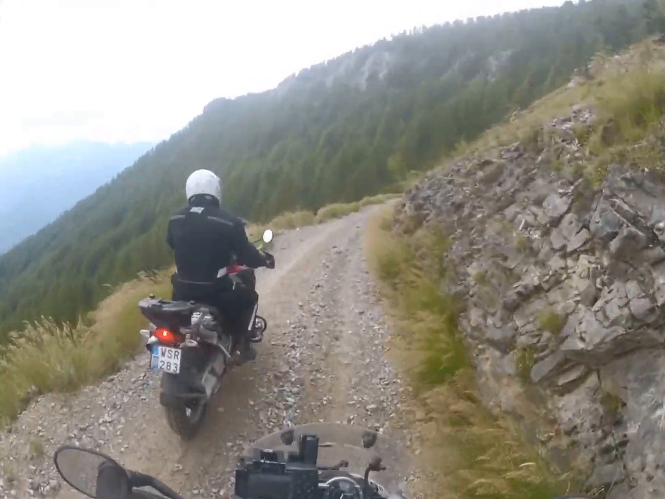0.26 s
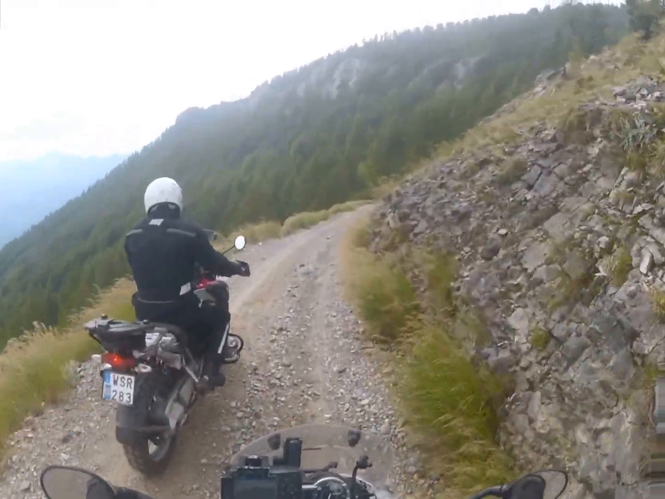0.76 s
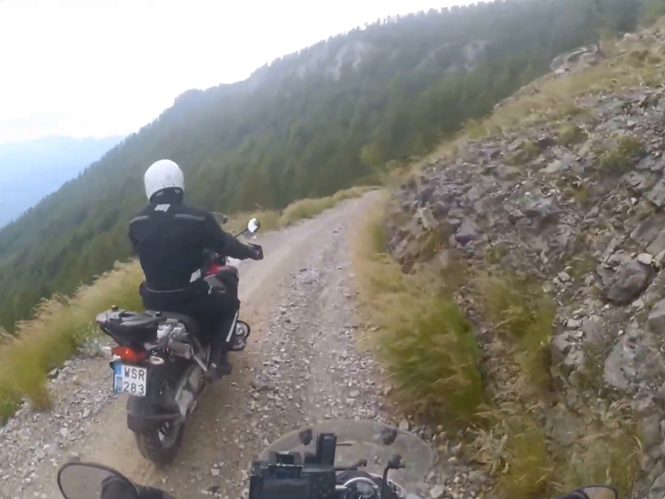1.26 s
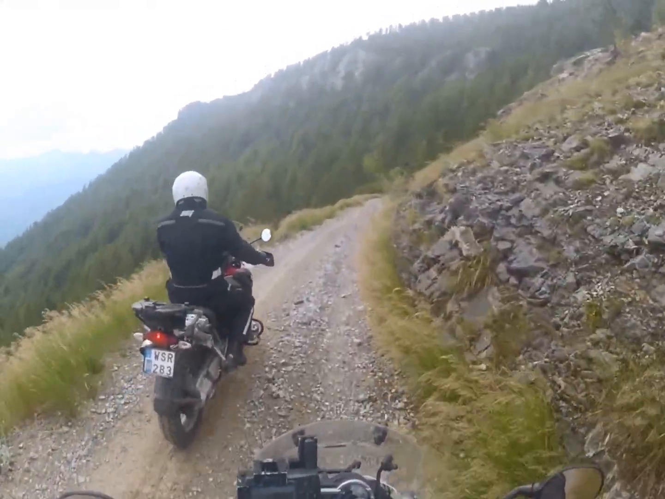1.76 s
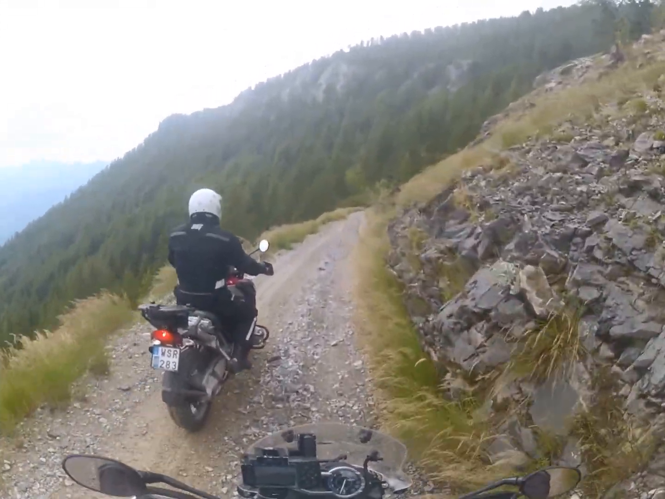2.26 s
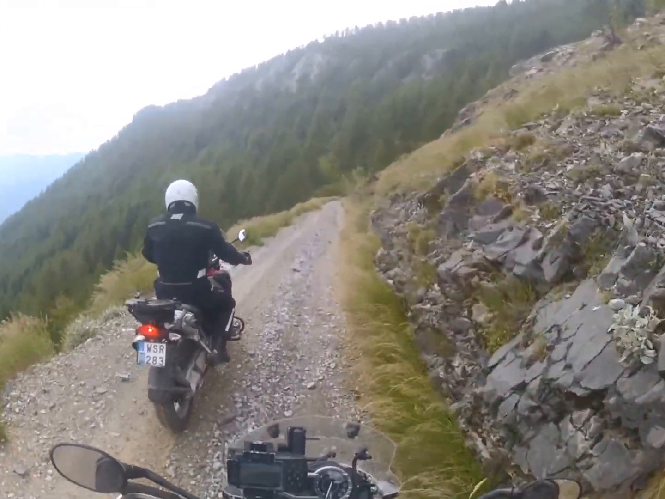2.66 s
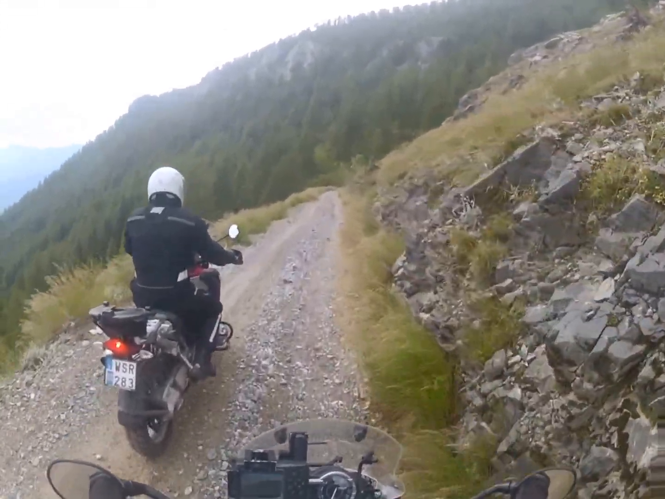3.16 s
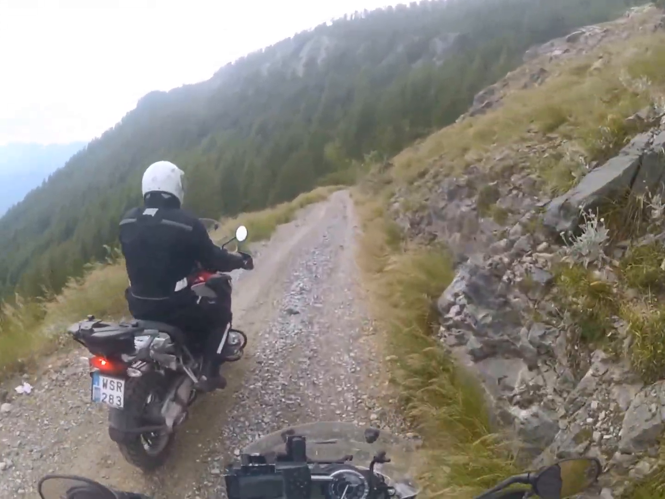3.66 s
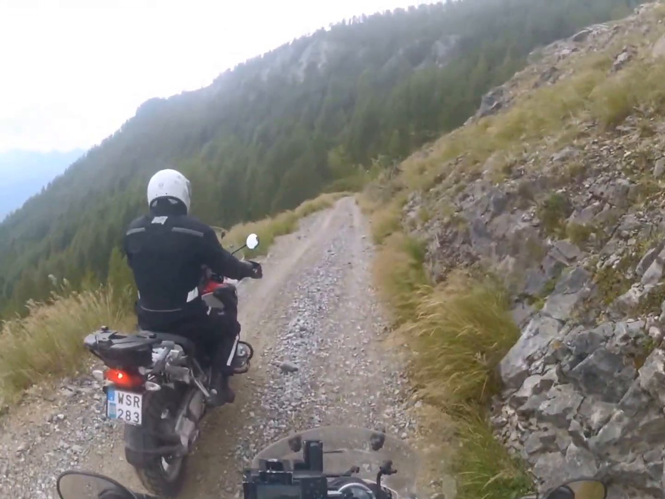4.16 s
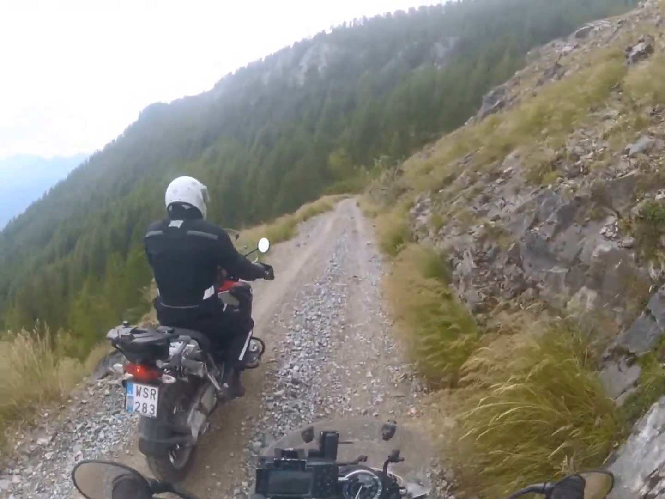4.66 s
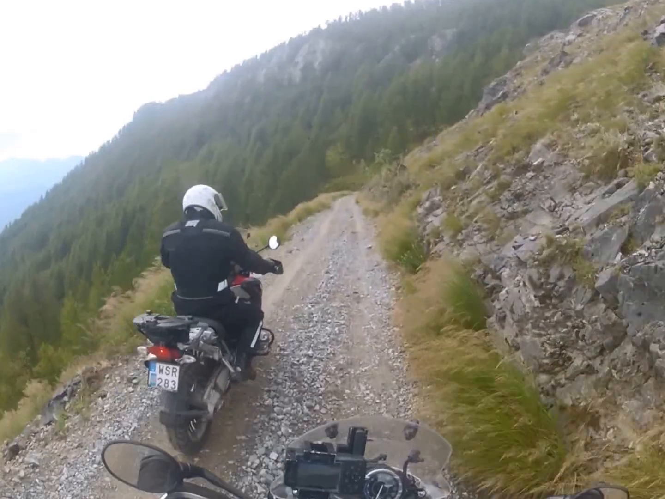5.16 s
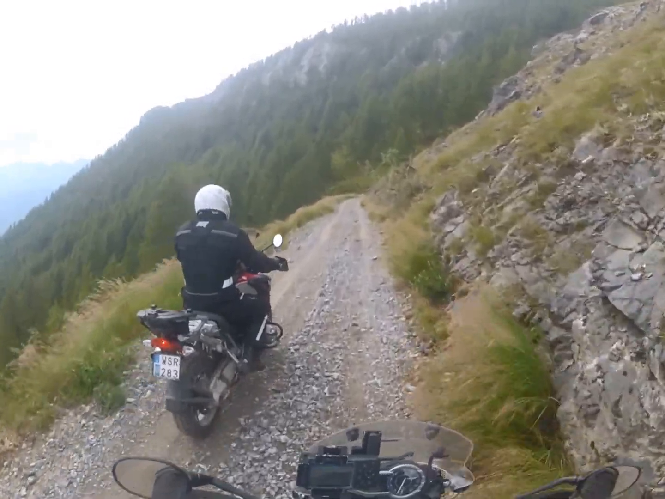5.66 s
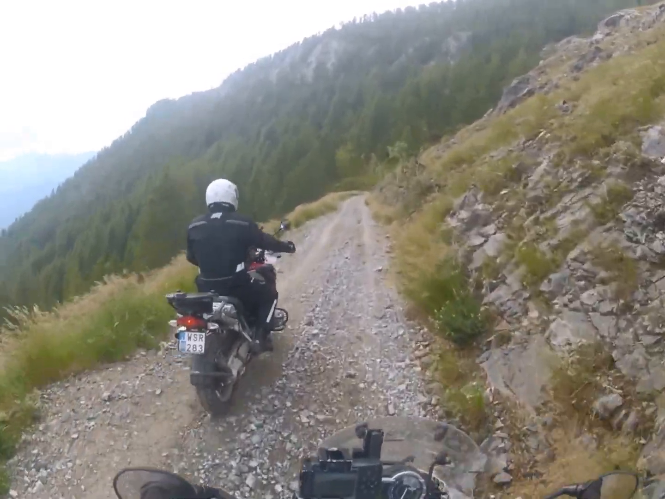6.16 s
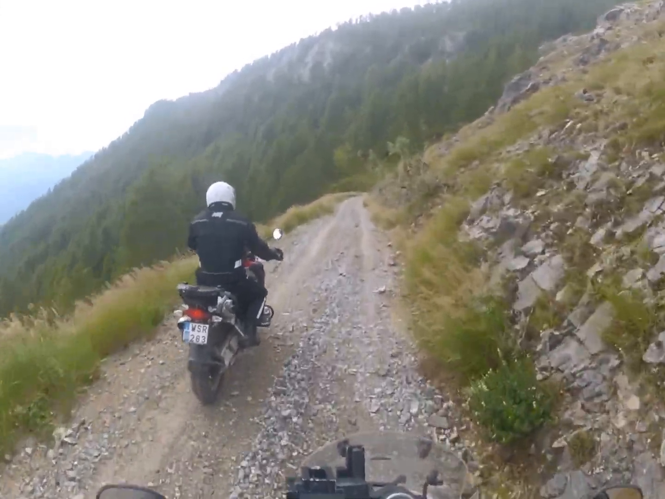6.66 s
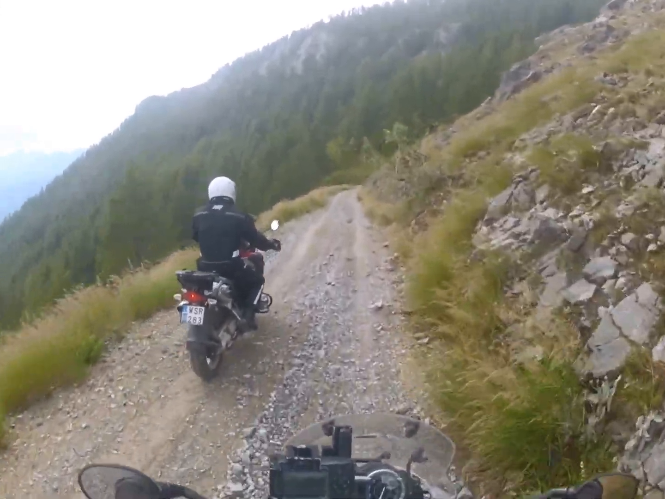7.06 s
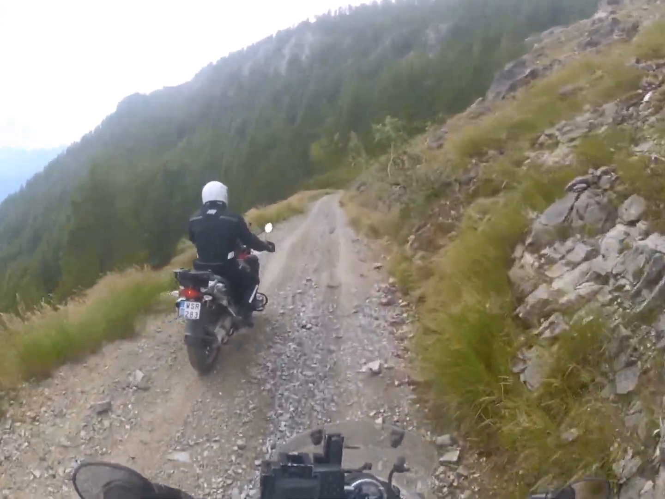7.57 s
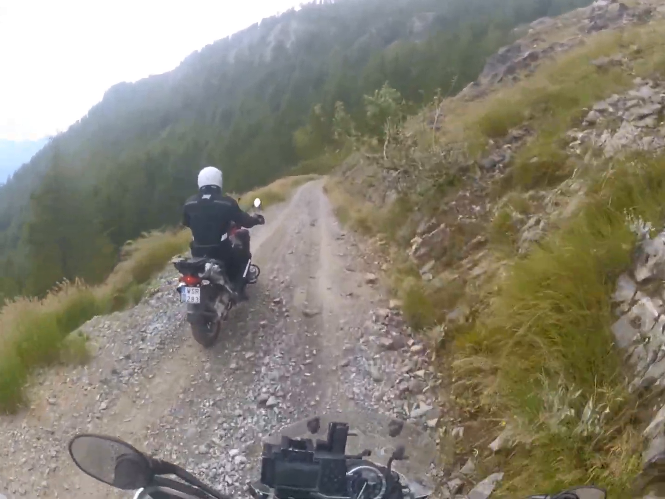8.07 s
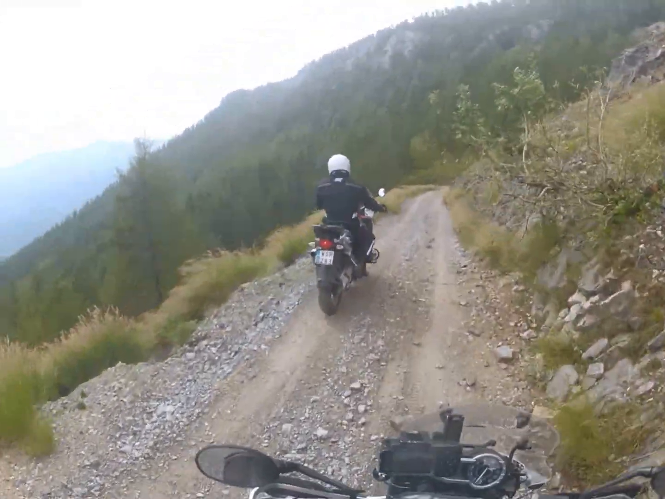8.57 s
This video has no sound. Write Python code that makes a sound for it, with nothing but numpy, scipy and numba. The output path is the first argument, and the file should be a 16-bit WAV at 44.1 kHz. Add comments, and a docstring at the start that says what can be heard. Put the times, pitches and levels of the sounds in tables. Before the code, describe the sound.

Close, boxed-in sound from a camera mounted on a slowly ridden motorcycle outdoors. The engine drones and chatters just above idle, briefly revving up around the middle and more firmly near the end. Low rumble and bouncing thuds come in clusters, with ticking joints and sharp plastic clacks, strongest after six seconds. Fine gravel crunch and light hiss stay underneath, with a harsh low-quality digital edge.

```python
"""A twin-cylinder motorcycle creeps along a stony mountain track: firings ring exhaust resonances, noise puffs
drive buzzing panels and a whining gear, and filtered grains make valve clatter and tyre crunch.
One microphone sits on the motorcycle, inside the sealed case of a rider's camera. Jolts swing its sprung mount
as a decaying sine, joints rattle, and knocks ring the modes of the case. The recorder samples coarsely and
holds each sample, which mirrors the sound into the treble."""
import sys
import numpy as np
from scipy import signal
from scipy.fft import rfft, irfft, next_fast_len
from scipy.io import wavfile
from scipy.ndimage import uniform_filter1d
from numba import njit

SR = 44100
rng = np.random.default_rng(int(sys.argv[2]) if len(sys.argv) > 2 else 0)


def wav_out(sig):
    """Save sig, one row per channel (or a flat mono array), as 16-bit PCM at SR to the path in sys.argv[1]."""
    wavfile.write(sys.argv[1], SR, np.round(np.clip(np.atleast_2d(sig).T, -1, 1) * 32767).astype(np.int16))


N = 388521


def undb(db):
    """Gain of a level in dB."""
    return 10 ** (np.asarray(db) / 20)


def level(x, db):
    """Scales a sound to an rms level."""
    return x * undb(db) / np.sqrt(np.mean(x ** 2))


def curve(table):
    """Second column of a table, interpolated over time to one value a sample."""
    s, values = np.transpose(table)
    return np.interp(np.arange(N) / SR, s, values)


@njit
def svf(x, g, k):
    """State-variable band-pass with moving tuning g and damping k, gain 1 at the centre."""
    y, b, l = np.empty(len(x)), 0., 0.
    for i in range(len(x)):
        v = (b + g[i] * (x[i] - l)) / (1 + g[i] * (g[i] + k[i]))
        b, l, y[i] = 2 * v - b, l + 2 * g[i] * v, k[i] * v
    return y


def band(x, hz, width, order=2):
    """A resonance; order counts the band-pass passes, each of this width, and more make it steeper."""
    tuning = np.tan(np.pi * hz / SR) * np.ones(N)
    damping = width / hz * np.ones(N)
    for _ in range(order):
        x = svf(x, tuning, damping)
    return x


def noise():
    """White noise over the whole scene."""
    return rng.standard_normal(N)


def walk(rate):
    """Random values held 1 / rate s and slewed twice; spread near 1."""
    hold = int(SR / rate)
    steps = np.repeat(rng.standard_normal(N // hold + 1), hold)
    slewed = uniform_filter1d(uniform_filter1d(steps, hold), hold)
    return 1.52 * slewed[:N]


def ring(modes, length, rise, spread):
    """Decaying sine modes with a soft onset; spread shifts each mode's level and pitch by chance."""
    t = np.arange(int(length * SR)) / SR
    y = 0
    for (hz, db, t60), chance in zip(modes, spread):
        sine = np.sin(2 * np.pi * hz * (1 + .008 * chance) * t)
        y = y + undb(db + 1.2 * chance) * sine * 1000. ** (-t / t60)
    return y * (1 - np.exp(-t / rise))


def add(out, s, sound):
    """Mixes a sound in at a time."""
    i = int(s * SR)
    out[i:i + len(sound)] += sound[:N - i]


def hiss():
    """Steady white noise at the microphone."""
    return undb(-59) * noise()


# how hard the track shakes the mount, close at the microphone: start_s, level_db [s, dB rms]
TRACK_SHAKING = [(0.0, -42), (1.47, -47.5), (2.58, -39.5), (2.77, -34), (3.09, -41.5), (3.95, -42.5),
                 (4.12, -27.5), (4.26, -38), (4.46, -53), (4.8, -32), (4.9, -27), (5.05, -44.5),
                 (5.44, -45), (5.86, -40.5), (6.87, -34), (7.14, -46.5), (7.6, -36), (8.19, -31),
                 (8.45, -36.5), (8.81, -35.5)]
# resonances of the trembling mount: pitch_hz, width_hz, level_db [Hz, Hz a pass, dB relative]
MOUNT_RESONANCES = [(37.4, 32.2, 1), (13.4, 5.7, -6.5), (125, 186, -18.5)]


def tremble():
    """The sprung mount filters noise from the rough track through a few wandering low resonances."""
    y = 0
    for hz, width, db in MOUNT_RESONANCES:
        y = y + level(band(noise(), hz, width), db) * undb(3.15 * walk(6.4))
    return undb(curve(TRACK_SHAKING)) * level(y, 0)


# jolts over stones, felt at the mount: start_s, peak_db, t60_s [s, dB, s the swing takes to fall 60 dB]
STONE_JOLTS = [(0.002, -21.5, 0.036), (0.171, -29, 0.11), (1.753, -32, 0.16), (2.01, -22, .12),
               (2.083, -24, 0.12), (2.288, -23, 0.15), (2.618, -32, 0.12), (2.686, -34, 0.064),
               (2.737, -23.5, 0.062), (2.777, -24, 0.1), (2.819, -22.5, 0.2), (2.892, -31, 0.28),
               (3.084, -34, .14), (3.584, -27.5, 0.16), (4.001, -37, 0.16), (4.028, -41, 0.15),
               (4.11, -17.5, 0.19), (4.18, -21.5, 0.15), (4.523, -18.5, 0.088), (4.581, -22, 0.12),
               (4.806, -29.5, 0.24), (4.852, -16, 0.14), (4.923, -23, 0.18), (5.355, -29.5, 0.11),
               (5.717, -32, 0.087), (5.763, -30, 0.25), (5.9, -28, 0.18), (6.293, -26, 0.081),
               (6.414, -32, 0.25), (6.46, -26, 0.13), (6.649, -31, 0.22), (6.779, -27.5, 0.096),
               (7.003, -29, 0.26), (7.447, -27.5, 0.31), (7.495, -20.5, .15), (7.602, -24, 0.15),
               (7.658, -41, 0.16), (7.727, -32, 0.089), (7.91, -31, 0.23), (8.072, -25, 0.13),
               (8.1, -16, .14), (8.146, -19.5, 0.074), (8.18, -44, .14), (8.228, -18, 0.086)]


def mount_swings():
    """Each jolt sets the sprung mount swinging freely near 42 Hz until damping stops it."""
    swings = np.zeros(N)
    for (s, db, t60), chance in zip(STONE_JOLTS, rng.standard_normal((len(STONE_JOLTS), 1))):
        swing = ring([(42.2, 0, t60)], length=.4, rise=.0045, spread=chance)
        add(swings, s, -undb(db) * swing / np.abs(swing).max())
    return swings


# resonances of loose joints beside the microphone: pitch_hz, width_hz, level_db
# [Hz, Hz a pass, dB against the rms swing]
JOINT_RESONANCES = [(97, 69, -16), (238, 56, -26.5), (283, 53, -30.5), (685, 130, -31.5), (1010, 350, -35),
                    (1560, 190, -40)]


def joint_rattle(swings):
    """Loose joints tick at random, harder the wider the mount swings, and each tick rings them."""
    happens, strength = rng.random((N, 2)).T
    swing_width = uniform_filter1d(np.abs(swings), int(.013 * SR))
    ticks = (happens < 160 / SR) * (strength - .5) * swing_width  # about 160 ticks a second
    rattle = sum(level(band(ticks, hz, width), db) for hz, width, db in JOINT_RESONANCES)
    return np.sqrt(np.mean(swings ** 2)) * rattle


def strike(modes, spread):
    """Case modes swell over the contact time, peak roughly in step and die away."""
    contact_s = .0009
    t = np.arange(int(.08 * SR)) / SR - contact_s
    y = 0
    for (hz, db, t60), chance in zip(modes, spread):
        wave = np.cos(2 * np.pi * hz * (1 + .012 * chance) * t + .9 * chance)
        y = y + undb(db + 1.5 * chance) * wave * 1000. ** (-np.maximum(t, 0) / t60)
    return y * np.sin(np.pi / 2 * np.minimum(1 + t / contact_s, 1))


# knocks on the case round the microphone: start_s, crack_db, low_db, middle_db, high_db, thud_db, ring_share
# [s, dB, then four levels in dB against the crack, share of the free ring time]
CASE_KNOCKS = [(0.162, -48, 3, 0, -21, 14, 0.41), (0.235, -54.5, 5, -12, 11, -12, 0.93),
               (1.707, -21.5, -13.5, -21, -5, -38, 0.54), (1.784, -45, -7, -9, -24, -20, 0.76),
               (1.931, -55, 9, -4, -1, 24.5, 0.79), (2.001, -32.5, 4, 0.5, -28, 4.5, .9),
               (2.0489, -43, 7, 5, -19, 21.5, 0.3), (2.0861, -55.5, 7, 5, -23, 13, 0.38),
               (2.2752, -54.5, 4, 8.5, -21, 24.5, 0.3), (2.551, -55, 6, -2, -18, 12, 0.42),
               (2.6031, -53.5, -1, 5, -21, 3, 0.39), (2.683, -31.5, -8.5, -8, -7.5, -14, 1),
               (2.732, -56.5, 11, 1, -22, 25, 0.41), (2.7709, -52.5, 4, 5, -16, 19, .45),
               (2.8228, -55, 13, -9, -12, 20.5, 0.64), (2.955, -56, 11, 2.5, -20, 14, 0.66),
               (4.0097, -55.5, 3, 7, -18, 21.5, 0.71), (4.0793, -44.5, 5, -2, -22, 11.5, 0.38),
               (4.139, -31.5, -8.5, -14, -35, -23, 0.75), (4.1542, -35.5, 2, -3, -32, 14.5, 0.76),
               (4.197, -49.5, 3, -2, -18, 15, 0.45), (4.514, -51, -6, 3, -23, 16, 0.65),
               (4.563, -32, -5, -4, -42, 12.5, 0.61), (4.8219, -49, -3, 2, -22, 12, 0.7),
               (4.851, -53, 8, -1, -18, 0, 0.59), (4.882, -38, -14, -9, -26, -13, .5),
               (4.902, -43.5, 8, 5, -27, 19, 0.54), (4.965, -62, 11, 0, -15, 24, 0.46),
               (5.769, -56, 7, -5, -15, 12, 0.54), (5.89, -50.5, -2, -6, -12, 16, 0.4),
               (6.2181, -16, -18, -12, -13, -12, 0.88), (6.266, -40.5, -9, -15, -5, -5, 1),
               (6.468, -43, 0, -2, -29, 14, 0.77), (6.652, -53, 1, -8, -15, 21, 0.48),
               (6.726, -15, -12, -7, -7.5, -11, 1), (6.783, -54.5, 11, -3, -16, 18, 0.42),
               (6.862, -53, 9, 7, -16, 10, 0.5), (7.007, -22, -4, -3.5, -15, -3.5, 0.76),
               (7.2352, -56, 15.5, -8, -13, -14, 1), (7.353, -48, 3, -11, 1.5, -10, 0.87),
               (7.4669, -42.5, 6.5, -9, -23, 10.5, 0.58), (7.6036, -57.5, 5, 7.5, -28, 28, 1),
               (7.7218, -34.5, -5, -6, -20, -25, 0.8), (7.747, -23.5, -11, -15, -4.5, -42, 1),
               (7.785, -47, 7, -16, -18, 5, 0.54), (7.909, -54, 0, -2, 9, 10, 0.94),
               (7.953, -50, -2, -8, 6, 11, 0.77), (8.101, -30.5, -11, -2, -41, 11.5, 0.35),
               (8.1432, -41, 5.5, -1, -26, 8, 0.64), (8.224, -41, -1, -6.5, -21, 9, 0.47),
               (8.5647, -25.5, -11, -14, -24, -34, .8)]
# modes of the case: pitch_hz, level_db, t60_s [Hz, dB before a knock's colour, s when ringing freely]
CASE_MODES = [(342, -22, .06), (720, 2, .036), (860, -9, .016), (1116, 5, .032), (1420, -11, .012),
              (1630, -1, .013), (1790, 1, .017), (2040, -15, .01), (2262, 2, .036), (2480, -8, .011),
              (2830, -28, .008), (3280, -17, .011), (3500, -17, .009)]
# where a knock's colour acts: pitch_hz of body, low, middle, crack, high and tip [Hz]
KNOCK_COLOUR_HZ = (342, 720, 1115, 1700, 2300, 3200)
# rings of the case and the mount after a push: pitch_hz, level_db, t60_s [Hz, dB against the push, s]
PUSH_RINGS = [(254, 2, 0.023), (40.3, 1, 0.12)]


def knocks():
    """Each knock rings the case, pushes the microphone inwards for a moment and leaves a short noisy scuff."""
    out, scuff = np.zeros(N), np.zeros(N)
    push_s, body_db = .00314, 18  # the body mode follows the low ring, this much above it
    push = np.hanning(int(push_s * SR))
    scuff_fade = np.exp(-np.arange(2000) / SR / .005)
    mode_hz = np.transpose(CASE_MODES)[0]
    spreads = rng.standard_normal((len(CASE_KNOCKS), 14))
    for (s, db, low_db, mid_db, high_db, thud_db, share), spread in zip(CASE_KNOCKS, spreads):
        # a strong thud goes with a dull tip
        tints = (body_db + min(low_db, 4), low_db, mid_db, 0, high_db, -np.clip(thud_db, 0, 12))
        colour = np.interp(mode_hz, KNOCK_COLOUR_HZ, tints)
        modes = [(hz, gain_db + tint, t60 * share) for (hz, gain_db, t60), tint in zip(CASE_MODES, colour)]
        add(out, s, -undb(db) * strike(modes, spread))
        add(out, s, -undb(db + thud_db) * push)
        rebound = ring(PUSH_RINGS, length=.2, rise=.0001, spread=spread[12:])
        add(out, s + push_s, undb(db + thud_db) * rebound)
        add(scuff, s, undb(db + max(mid_db, -10) + .5) * scuff_fade)
    return out + scuff * level(band(noise(), 1145, 880), 0)


# the case passes little between some of its modes: pitch_hz, width_hz, depth [Hz, Hz, share 0-1]
CASE_DIPS = [(500, 240, .75), (1280, 110, .8), (2800, 300, .7)]


def through_case(shocks):
    """The case walls weaken shocks in a few bands: part of each band is taken away."""
    for hz, width, depth in CASE_DIPS:
        shocks = shocks - depth * band(shocks, hz, width, order=1)
    return shocks


REFERENCE_HZ = 27  # firing rate near idle, at which the engine levels are stated
DRIFT = .018  # scale of the random pitch wander, share of the pitch

# colour of clatter and gravel inside the case: pitch_hz, width_hz, level_db [Hz, Hz a pass, dB relative]
CLATTER_BANDS = [(832, 810, -0.5), (1690, 355, 3), (2154, 300, 0), (2801, 304, -1), (3330, 286, -6.5)]
# level of clatter and gravel: start_s, level_db [s, dB added to their base level]
CRUNCH_LEVEL = [(0.0, 2), (1.3, 0.6), (3.0, -.7), (5.5, 0.2), (8.81, -0.3)]


def running_gear(hz, puff):
    """Valve clatter once a firing and gravel grains under the tyres, coloured by the case."""
    happens, size = rng.random((N, 2)).T
    grain_gain = undb(np.minimum(-3.5 * np.log(size + 1e-9), 14))
    grains = (happens < 300 / SR) * grain_gain * rng.choice([-1, 1], N)  # about 300 a second
    source = puff * noise() + level(grains, -.5)
    y = 0
    for f, width, db in CLATTER_BANDS:
        coloured = band(source, f * (1 + DRIFT * walk(12)), width)
        y = y + level(coloured, db) * undb(.79 * walk(18))
    gear_db = -57 + curve(CRUNCH_LEVEL) + .38 * (hz - REFERENCE_HZ) + .42 * walk(3.51)
    return undb(gear_db) * level(y, 0)


# a buzzing panel, a whining gear and its octave, two more panels, all on the motorcycle:
# pitch_hz, width_hz, level_db, slope_db_per_hz, glide
# [Hz at the reference rate, Hz a pass, dB relative, dB per Hz of firing rate, how closely pitch follows revs 0-1]
PANELS_AND_GEAR = [(885, 55, 0, -1.8, 0), (945, 65, -9, 1.5, .8), (1870, 130, -8, 1.5, .8),
                   (1935, 70, -4, -1, .2), (1760, 60, -4, -.6, .3)]


def panels_and_gear(hz, puff, gas):
    """Noise puffs and exhaust gas drive panel resonances and gear tones, some of which climb with the revs."""
    revs = uniform_filter1d(hz, SR // 3) / REFERENCE_HZ
    y = 0
    for f, width, db, slope, glide in PANELS_AND_GEAR:
        drive = puff * noise() + 1.5 * gas
        pitch = f * revs ** glide * (1 + DRIFT / 2 * walk(5))
        y = y + level(band(drive, pitch, width), db) * undb(slope * (hz - REFERENCE_HZ) + walk(24))
    buzz_db = -59 - .45 * (hz - REFERENCE_HZ) + 1.5 * walk(4)
    return undb(buzz_db) * level(y, 0)


def frame_hum(turns):
    """The frame hums as a sine at three times the firing rate."""
    hum = np.sqrt(2) * np.sin(2 * np.pi * 3 * turns)
    return undb(-59.5 + walk(1.7)) * hum


def silencer(x):
    """Two all-pass chambers echo each firing and spread it in time without colouring it."""
    size = next_fast_len(N)
    spectrum, hz = rfft(x, size), np.arange(size // 2 + 1) * SR / size
    echo = .6  # share sent back
    for round_trip_s in (.0073, .0119):
        late = np.exp(-2j * np.pi * hz * round_trip_s)
        spectrum = spectrum * (late - echo) / (1 - echo * late)
    return irfft(spectrum, size)[:N]


def exhaust_gas(turns):
    """One pulse a firing, uneven in strength and weaker every second time, through the silencer, plus noise."""
    at = np.flatnonzero(np.diff(np.floor(turns)))
    chance_db = 1.4 * rng.standard_normal(len(at))
    second_cylinder_db = -2 * (np.arange(len(at)) % 2)
    pulses = np.zeros(N)
    pulses[at] = undb(chance_db + second_cylinder_db)
    return level(silencer(pulses), 0) + undb(-9.5) * noise()


# exhaust resonances as they reach the case: pitch_hz, width_hz, level_db [Hz, Hz a pass, dB relative]
EXHAUST_RESONANCES = [(177, 177, -6.5), (210.1, 44, 7.5), (263.7, 41, -4.5)]


def exhaust_drone(hz, gas):
    """Firing gas rings the exhaust resonances, louder at higher revs and while the revs climb."""
    y = 0
    for k, (f, width, db) in enumerate(EXHAUST_RESONANCES):
        y = y + (-1) ** k * undb(db + 1.43 * walk(11)) * band(gas, f, width)
    climb = uniform_filter1d(np.gradient(hz) * SR, int(.15 * SR))  # Hz/s
    drone_db = -51 + .25 * (hz - REFERENCE_HZ) + .08 * climb + .27 * walk(3.57)
    return undb(drone_db) * level(y, 0)


# firing rate of the engine under the rider: start_s, pitch_hz [s, Hz]
FIRING_RATE = [(0.0, 28.57), (0.42, 26.54), (0.72, 28.27), (1.0, 26.7), (1.2, 26.71), (1.3, 26.08),
               (1.49, 28.04), (1.7, 25.68), (2.2, 26.82), (2.82, 31.37), (3.26, 28.75), (3.61, 33.54),
               (4.02, 27.7), (4.49, 27.16), (4.76, 28.22), (5.1, 25.99), (5.42, 27.12), (5.68, 25.65),
               (5.92, 27.26), (6.38, 28.15), (6.75, 26.08), (7.09, 28.1), (7.44, 26.9), (7.75, 33.34),
               (8.02, 33.27), (8.2, 34.77), (8.41, 33.87), (8.52, 30.6), (8.81, 30.68)]


def engine():
    """Nearly even firings drive exhaust and frame; puffs that fade after each firing drive panels and clatter."""
    hz = curve(FIRING_RATE)
    turns = np.cumsum(hz * (1 + .003 * walk(25))) / SR  # counts firings
    puff = 1 + 1.6 * np.exp(-(turns % 1))
    gas = exhaust_gas(turns)
    body = running_gear(hz, puff) + panels_and_gear(hz, puff, gas) + frame_hum(turns)
    return body + exhaust_drone(hz, gas)


def scene():
    """Everything reaches one microphone inside the case; shocks come through its walls."""
    swings = mount_swings()
    shocks = tremble() + swings + joint_rattle(swings) + knocks()
    return (hiss() + through_case(shocks) + engine())[None]


def record(dry):
    """Coarse sampling; each sample is held, so mirror images of the sound climb the treble; then the top is cut."""
    sample_hz, store_hz, top_hz = 8000, 48000, 15600
    edge = signal.cheby1(8, .5, 3800, fs=SR, output="sos")
    coarse = signal.resample_poly(signal.sosfilt(edge, dry), sample_hz, SR, axis=1, window=("kaiser", 2.))
    held = np.repeat(coarse, store_hz // sample_hz, axis=1)
    out = signal.resample_poly(held, SR, store_hz, axis=1)[:, :N]
    top_cut = signal.ellip(8, .2, 70, top_hz, fs=SR, output="sos")
    return signal.sosfilt(top_cut, out)


dry = scene()
out = record(dry)
wav_out(out)
```